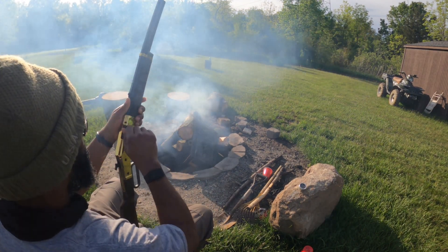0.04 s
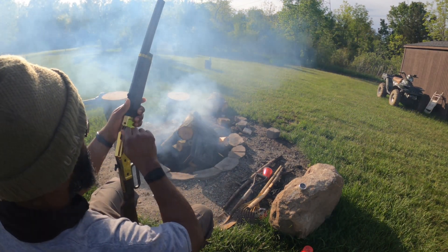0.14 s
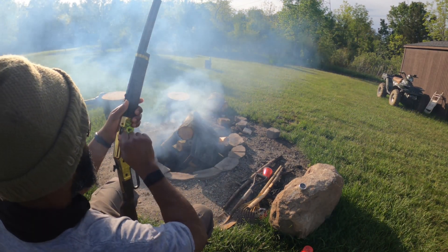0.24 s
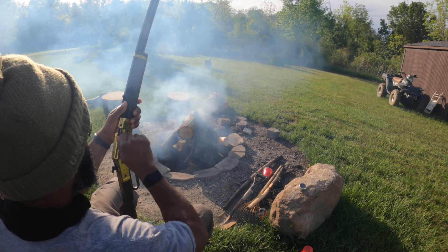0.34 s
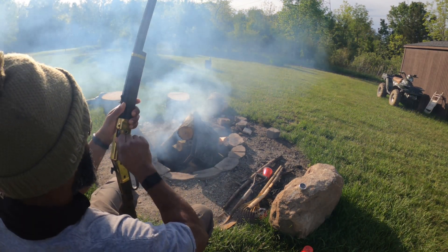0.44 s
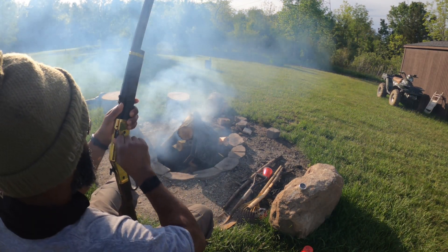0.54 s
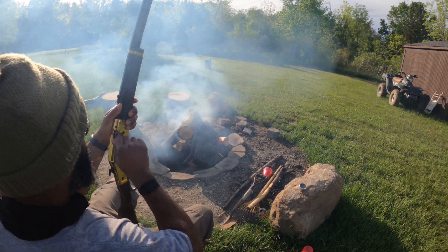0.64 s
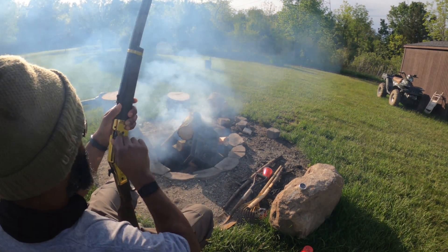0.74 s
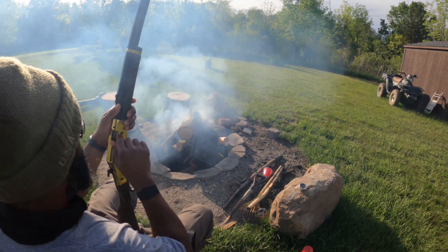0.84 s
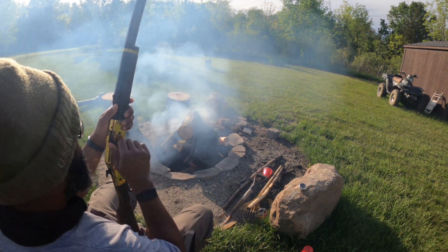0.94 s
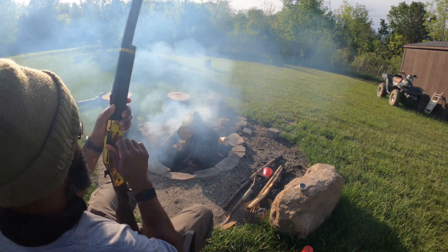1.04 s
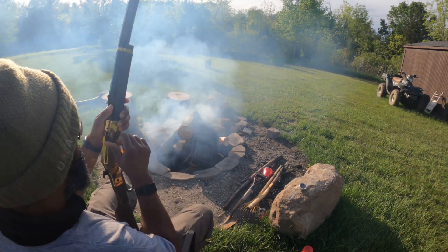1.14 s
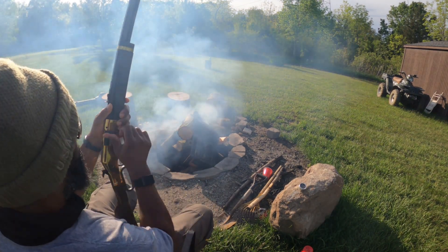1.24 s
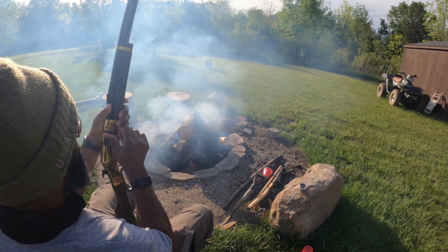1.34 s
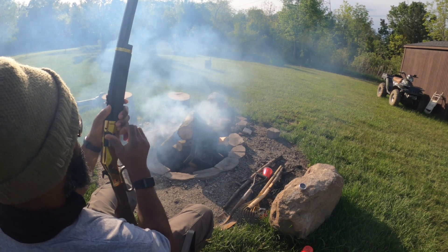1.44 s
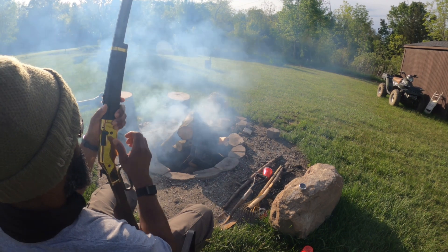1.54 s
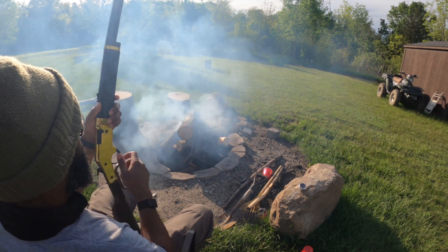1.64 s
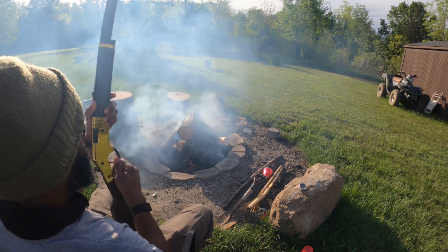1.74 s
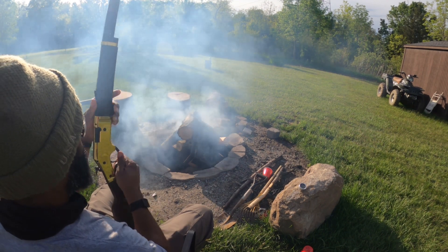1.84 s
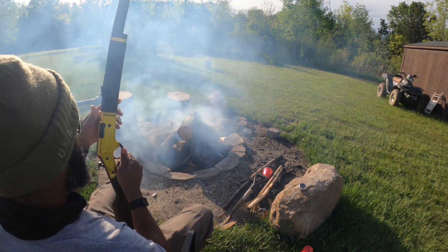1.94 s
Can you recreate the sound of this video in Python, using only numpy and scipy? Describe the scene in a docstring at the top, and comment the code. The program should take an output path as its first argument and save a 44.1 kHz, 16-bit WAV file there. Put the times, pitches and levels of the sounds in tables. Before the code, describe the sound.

Close, dry metallic clicks and short scrapes from a rifle lever, strongest early and again past the middle, then quiet with soft cloth rustle, low rumble and faint birdsong in an open yard.

```python
"""An air rifle's lever and action, worked by hand outdoors, close to a two-port microphone.
Steel parts click and latch as short bursts of ringing modes with a noisy crack; sliding parts scrape as
dense noise grains. Behind them lie a low rumble with a faint wavering hum, a broad outdoor hush and a soft
rustle of cloth, all shaped noise but for the sine hum; distant birds whistle gliding sines with echoes."""
import sys
import numpy as np
from scipy import signal
from scipy.fft import rfft, irfft, next_fast_len
from scipy.io import wavfile
from scipy.ndimage import uniform_filter1d, map_coordinates

SR = 44100
rng = np.random.default_rng(int(sys.argv[2]) if len(sys.argv) > 2 else 0)


def unload_wav(signal):
    """Save mono or channel-first audio to the path in sys.argv[1] as 16-bit WAV at rate SR, clipped to [-1, 1]."""
    wavfile.write(
        sys.argv[1],
        SR,
        np.round(np.clip(np.atleast_2d(signal).T, -1, 1) * 32767).astype(np.int16),
    )


def natural_amplitude(level_db):
    """Convert a level in decibels to a linear amplitude factor, elementwise."""
    exponent = np.asarray(level_db, float) / 20
    return 10 ** exponent


N = 88200


def unit(x):
    """Scaled to rms 1."""
    return x / np.sqrt(np.mean(x ** 2) + 1e-20)


def along(points, hz):
    """(frequency [Hz], value) points read on a log frequency axis."""
    f, value = np.transpose(points)
    return np.interp(np.log(hz + 1), np.log(f + 1), value)


def curves(rows, outside=None):
    """One value per sample for each column after the time."""
    s, *columns = np.transpose(rows)
    return [np.interp(np.arange(N) / SR, s, column, outside, outside) for column in columns]


def wobble(rate):
    """A smooth random curve with rate knots a second."""
    knots = rng.standard_normal(int(N * rate / SR) + 4)
    return map_coordinates(knots, [np.arange(N) * rate / SR])


def filtered(x, response):
    """x passed through a complex response of frequency."""
    n = x.shape[-1]
    m = next_fast_len(n + 4096)
    return irfft(rfft(x, m) * response(np.fft.rfftfreq(m, 1 / SR)), m)[..., :n]


# How alike the ambient sound is at the two ports: (frequency [Hz], left-right likeness [0 to 1])
PORT_LIKENESS = [(40, 1), (180, 0.86), (550, 0.85), (1650, 0.14), (15000, 0.13)]


def ambient_noise(spectrum, patchy_db):
    """Stereo noise of rms 1, its gain patchy in time and frequency; likeness sets mid against side."""
    z = signal.stft(rng.standard_normal((2, N)), nperseg=512)[2]
    field = uniform_filter1d(rng.standard_normal(z.shape[1:]), size=6, axis=0)
    field = uniform_filter1d(field, size=10, axis=1)
    pair = signal.istft(z * natural_amplitude(patchy_db * unit(field)), nperseg=512)[1][:, :N]

    def response(hz):
        angle = np.arccos(np.clip(along(PORT_LIKENESS, hz), -1, 1)) / 2
        return natural_amplitude(along(spectrum, hz)) * [np.cos(angle), np.sin(angle)]

    mid, side = filtered(pair, response)
    return unit(np.array([mid + side, mid - side]))


# Colour of the low rumble: (frequency [Hz], relative level [dB])
RUMBLE_COLOUR = [(15, -41), (25, -16.5), (50, -0.5), (115, -1.5), (190, -9.5), (320, -18.5), (500, -66)]


def rumble():
    """Low noise whose level drifts slowly."""
    return natural_amplitude(-53 + 1.4 * wobble(3.0)) * ambient_noise(RUMBLE_COLOUR, patchy_db=2.0)


# Tones of the faint hum: (frequency [Hz], mean rms level [dB])
HUM_TONES = [(119.5, -63.5), (179, -64.5)]


def hum():
    """Steady low sines that waver in level and phase."""
    t, out = np.arange(N) / SR, np.zeros(N)
    for hz, db in HUM_TONES:
        level = np.sqrt(2) * natural_amplitude(db + 2.5 * wobble(6))
        out += level * np.sin(2 * np.pi * hz * t + .6 * wobble(5))
    return out


# Colour of the outdoor hush: (frequency [Hz], relative level [dB])
HUSH_COLOUR = [(150, -39), (400, 0.5), (1000, 3), (1400, -2.5), (1900, -10.5), (2550, -3), (3100, -15),
               (4000, -17.5), (6000, -26), (11000, -70)]


def hush():
    """Broad outdoor noise of even mean level."""
    return natural_amplitude(-64.5) * ambient_noise(HUSH_COLOUR, patchy_db=3.63)


# Swells of the cloth: (time [s], level [dB])
RUSTLE_LEVEL = [(0, -91), (.15, -76), (.6, -88.5), (1.445, -89), (1.47, -80.5), (1.535, -79.5),
                (1.56, -100), (1.67, -83), (1.8, -77), (1.865, -67.5), (1.9, -78.5), (2, -79)]
# Colour of the cloth: (frequency [Hz], relative level [dB])
CLOTH_COLOUR = [(800, -41), (2000, 6), (4000, -4.5), (5200, -0.5), (7500, 1.5), (10000, -10.5),
                (13500, -21), (16000, -59)]


def cloth():
    """Soft rustle: bright noise that swells and flutters."""
    level_db = curves(RUSTLE_LEVEL)[0] + 1.5 * wobble(50)
    return natural_amplitude(level_db) * ambient_noise(CLOTH_COLOUR, patchy_db=1.2)


# Modes the steel action rings with: (frequency [Hz], level within its group [dB], t60 [s])
STEEL_MODES = [(1131, -2.5, 0.035), (1260, 3.5, 0.0084), (1400, -15, 0.027), (1655, -4.5, 0.0097),
               (2203, 5.5, 0.0097), (2936, -0.5, 0.015), (3210, 0.5, 0.012), (3660, 0.5, 0.01),
               (4046, -4, 0.027), (4840, 2, 0.0033), (5780, 0, 0.005), (6600, -6.5, 0.014),
               (7590, 0, 0.0027), (8780, -8, 0.0097)]
# Colour of scraping and cracks: (frequency [Hz], relative level [dB])
SCRAPE_COLOUR = [(500, -39), (850, -19.5), (1200, -3.5), (1900, -2), (2600, -4.5), (4000, -5), (5500, -4.5),
                 (8000, -16), (12000, -17.5), (15500, -41)]
# Parts sliding over each other, one list a stroke: (time [s], level [dB], brightness [dB per octave])
SLIDE_STROKES = [
    [(0, -47, 1.5), (.03, -59, -3), (.09, -74, -5)],
    [(.18, -64.5, -20), (.215, -47, -4), (.23, -53, -5.5), (.25, -41.5, -2), (.272, -43.5, -8.5),
     (.295, -53.5, -3), (.31, -52.5, -5.5), (.36, -62.5, -3), (.41, -71, 0)],
    [(.675, -75, -3), (.681, -58, -4), (.7, -56, -8), (.72, -72, -9)],
    [(.8, -64.5, -7.5), (.835, -53, -24), (.87, -80, 4.5)],
    [(1.1, -83, -11), (1.164, -62.5, -4.5), (1.169, -54, 5), (1.183, -55, -4), (1.208, -48, 1),
     (1.228, -52, -2.5), (1.25, -34, -3.5), (1.275, -55.5, -3), (1.32, -63, -10.5)],
]


def scraping():
    """Dense uneven grains excite the steel modes; each stroke shifts between dull and bright."""
    grains_per_s, spread_db = 4800, 1.5
    density = (rng.random(N) < grains_per_s / SR) + 0.035  # grains over a faint continuous floor
    grains = rng.standard_normal(N) * density * natural_amplitude(spread_db * wobble(180))

    def steel(f):
        total = 1
        for centre, _, t60 in STEEL_MODES:
            width = 4 / t60
            total = total + 110j * t60 * f * width / (centre ** 2 - f ** 2 + 1j * f * width)
        return total

    def tilted(slope):
        return lambda f: steel(f) * natural_amplitude(along(SCRAPE_COLOUR, f) + slope * np.log2(f / 2000 + .1))

    slopes = np.array([-9, -4, 0, 3])  # dB per octave, from dull to bright
    layers = [unit(filtered(grains, tilted(slope))) for slope in slopes]
    out = np.zeros(N)
    for rows in SLIDE_STROKES:
        level_db, brightness = curves(rows, outside=-150)
        fade_out = np.clip((rows[-1][0] - np.arange(N) / SR) * 60, 0, 1)
        # crossfade the two layers nearest in brightness
        blend = sum(np.interp(brightness, slopes, row) * x for row, x in zip(np.eye(len(slopes)), layers))
        out += fade_out * natural_amplitude(level_db) * blend
    return out


# Contacts of steel parts, peak levels ahead of the port and reflection filters: (time [s],
# low ring [dB], middle ring [dB], high ring [dB], build-up [ms], favoured pitch [Hz])
STEEL_CONTACTS = [(.0425, -72, -59, -53, 1.8, 6600), (0.139, -57, -50, -56.5, 1.5, 4000),
                  (0.184, -49, -61, -67, 1.5, 1400), (0.2047, -28.5, -30, -34.5, 3.25, 1620),
                  (0.234, -29.5, -33.5, -41.5, 2.82, 1620), (.257, -62, -49, -39, 2.2, 4750),
                  (0.2725, -44, -42, -50, 0.8, 4170), (.276, -11, -17, -22.5, 1.52, 1177),
                  (0.286, -48, -30.5, -38, 1.4, 4266), (.3115, -73, -69, -44.5, 1.2, 6600),
                  (.3178, -52, -43, -44, 1.2, 4050), (.3247, -50, -41, -50, 1.5, 4100),
                  (.3322, -52, -42, -47, 1, 4050), (.3435, -53, -42, -46, 1.5, 4100),
                  (.3555, -55, -46, -58, 2.5, 4100), (0.675, -47, -57.5, -73, 3, 1620),
                  (0.6905, -39, -57, -73, 1, 1490), (0.6975, -43.5, -65, -75, 1.2, 1320),
                  (0.7995, -22, -33, -47.5, 2.4, 1194), (0.8266, -32, -46.5, -76, 1.7, 1560),
                  (1.1109, -50, -53.5, -70, 1.42, 2600), (1.1164, -47.5, -51.5, -70, 1.49, 2800),
                  (1.1471, -52, -59, -66.5, 1, 1400), (1.1677, -70, -43, -43, 0.75, 2380),
                  (1.171, -58, -39, -62, 1, 2800), (1.1755, -46, -38, -39, 2.2, 4750),
                  (1.1862, -50, -38, -45, 1.5, 2875), (1.1885, -47, -32, -43, 1.3, 4100),
                  (1.2005, -52, -41, -46, 1.1, 4100), (1.2138, -38, -29, -33, 1.8, 2500),
                  (1.2344, -15.5, -28.5, -39.5, 1.135, 1260), (1.24, -16.5, -18, -22, 2.2, 1627),
                  (1.258, -16.5, -26, -34.5, 0.66, 1562), (1.39, -74, -53.5, -64, 1.06, 4120)]
# Centres of the low, middle and high rings: frequency [Hz]
RING_CENTRES = (1300, 3000, 7000)


def clicks():
    """Each contact builds up, peaks with its modes nearly in step, then rings out with a noisy crack."""
    scatter_db = 2  # mode levels from blow to blow
    favour_db, favour_oct = 12, .12  # lift and half-width of the part that rings loudest
    crack_db, crack_t60_s = -6, .013
    out, t = np.zeros(N + SR), np.arange(4096) / SR
    hz, level, t60 = np.transpose(STEEL_MODES)[..., None]
    group = np.abs(np.log(hz / np.array(RING_CENTRES))).argmin(axis=1)[:, None]
    weights = [list(zip(RING_CENTRES, row)) for row in np.eye(len(RING_CENTRES))]
    for s, low, mid, high, build_ms, favoured in STEEL_CONTACTS:
        since_peak = t - build_ms / 1000
        rise = np.sin(np.pi / 2 * np.clip(t * 1000 / build_ms, 0, 1)) ** 2
        late = np.maximum(since_peak, 0)

        def dull(f):
            """Treble slope above the high centre, where the high ring is the weaker one."""
            return min(high - mid, 0) * np.maximum(np.log2(f / RING_CENTRES[-1] + 1e-9), 0)

        lift = favour_db * np.exp(-.5 * (np.log2(hz / favoured) / favour_oct) ** 2)
        scatter = scatter_db * rng.standard_normal(hz.shape)
        # high modes stray further from step at the peak
        stray = .8 * hz / RING_CENTRES[0] * rng.standard_normal(hz.shape)
        decay_db = level + lift + dull(hz) + scatter - 60 * late / t60
        ring = rise * natural_amplitude(decay_db) * -np.cos(2 * np.pi * hz * since_peak + stray)
        crack = rng.standard_normal(len(t)) * natural_amplitude(-60 * late / crack_t60_s) * rise
        start = round(s * SR)
        for k, db in enumerate((low, mid, high)):
            part = (ring * (group == k)).sum(axis=0)
            band = filtered(crack, lambda f: natural_amplitude(along(SCRAPE_COLOUR, f) + dull(f)) * along(weights[k], f) ** 2)
            part = part / np.abs(part).max() + natural_amplitude(crack_db) * band / np.abs(band).max()
            out[start:start + len(t)] += natural_amplitude(db) * part / np.abs(part).max()
    return out[:N]


# The rifle's level balance at the two ports: (frequency [Hz], left minus right [dB])
PORT_BALANCE = [(300, -.4), (1300, .7), (2400, 2), (4400, .8), (8000, -7.5), (15000, -5)]
# The rifle's phase at the two ports: (frequency [Hz], left leads by [rad])
PORT_LEAD = [(3000, -.2), (7700, -.7), (10000, .6), (13000, -.4)]
# Nearby reflections: (delay [s], level [dB])
REFLECTIONS = [(.0031, -12), (.0065, -14.5)]


def rifle():
    """Scraping and clicks at the two ports, with nearby reflections; small parts radiate little bass."""
    thin_hz, knock_db, skew_s = 817, -10, .00006
    parts = scraping() + clicks()
    highpass = signal.butter(4, thin_hz, "high", fs=SR, output="sos")
    x = natural_amplitude(knock_db) * parts + signal.sosfilt(highpass, parts)
    side = np.array([[.5], [-.5]])

    def at_ports(f):
        direct = natural_amplitude(side * along(PORT_BALANCE, f)) * np.exp(1j * side * along(PORT_LEAD, f))
        back = 0
        for k, (delay, db) in enumerate(REFLECTIONS):
            # each reaches one port first, in turn right and left; the skew grows with frequency
            skew = side * skew_s * (-2) ** k * np.clip(f / RING_CENTRES[1], 0, 2)
            back = back + natural_amplitude(db) * np.exp(-2j * np.pi * f * (delay + skew))
        return direct * (1 + back)

    return filtered(x, at_ports)


# Bird notes, one list a gliding call: (time [s], pitch [Hz], level before echoes [dB])
BIRD_CALLS = [
    [(.055, 1920, -68), (.07, 2909, -72), (.09, 3200, -72.5), (.11, 2230, -59)],
    [(.476, 2650, -74), (.488, 2620, -73), (.515, 3280, -71), (.524, 2655, -74)],
    [(.555, 3350, -69), (.578, 2650, -68), (.6, 2430, -67), (.617, 2600, -70), (.635, 3300, -72)],
    [(.708, 2500, -70), (.724, 2700, -68), (.736, 2130, -73)],
    [(1.48, 2750, -80), (1.54, 2100, -76)],
    [(1.468, 2190, -72.5), (1.515, 1980, -68)],
    [(1.74, 2200, -76), (1.8, 2400, -78)],
    [(1.735, 2700, -77), (1.8, 2550, -76), (1.86, 1950, -76), (1.89, 2404, -71), (1.96, 3460, -82),
     (2.01, 3190, -70.5)],
]


def birds():
    """Distant whistles: gliding, trembling sines, blurred by a short decaying noise echo."""
    fade_s, echo_db, echo_t60_s = .005, -4, .18
    t, out = np.arange(N) / SR, np.zeros(N)
    for rows in BIRD_CALLS:
        hz, level_db = curves(rows)
        hz = uniform_filter1d(hz, size=300)
        gate = np.clip(np.minimum(t - rows[0][0], rows[-1][0] - t) / fade_s, 0, 1)
        level = np.sqrt(2) * natural_amplitude(level_db + 2.5 * wobble(45))
        phase = 2 * np.pi * np.cumsum(hz * (1 + .018 * wobble(150))) / SR
        out += gate * level * np.sin(phase)
    tail = rng.standard_normal((2, SR // 4)) * natural_amplitude(-60 * t[:SR // 4] / echo_t60_s)
    echo = signal.fftconvolve(out[None], tail / np.linalg.norm(tail[0]), axes=1)[:, :N]
    return out + natural_amplitude(echo_db) * echo


def scene():
    """Everything at the microphone: the place, the rifle close by and the birds far off."""
    place = rumble() + hum() + hush() + cloth()
    return place + rifle() + birds()


def band_limit(x):
    """A steep low-pass at the top of the band."""
    return signal.sosfilt(signal.butter(12, 16420, fs=SR, output="sos"), x)


def record(dry):
    """The finished mix, as it is kept."""
    return band_limit(dry)


dry = scene()
out = record(dry)
unload_wav(out)
```